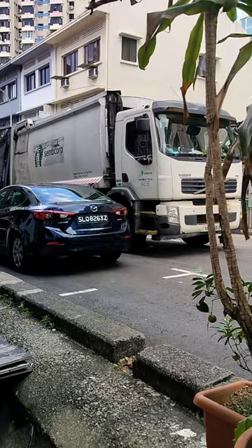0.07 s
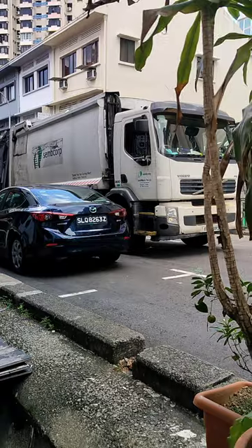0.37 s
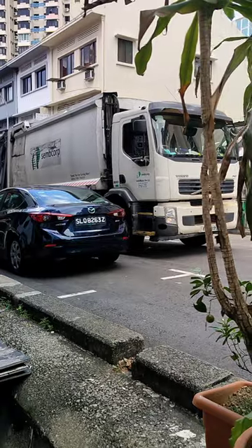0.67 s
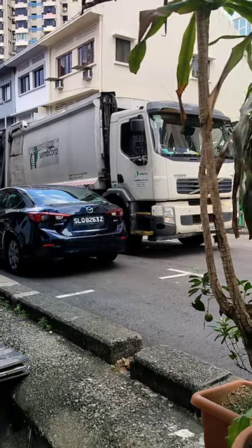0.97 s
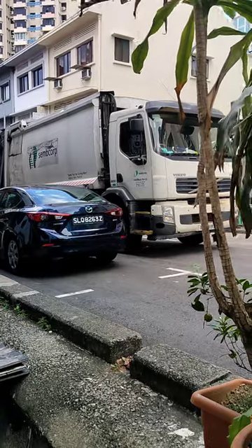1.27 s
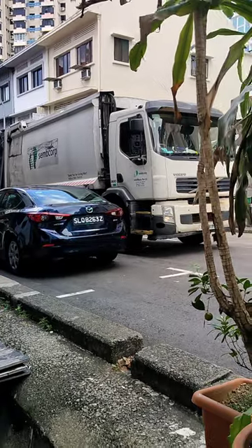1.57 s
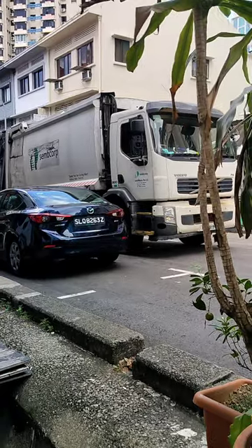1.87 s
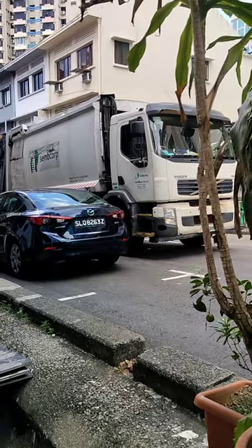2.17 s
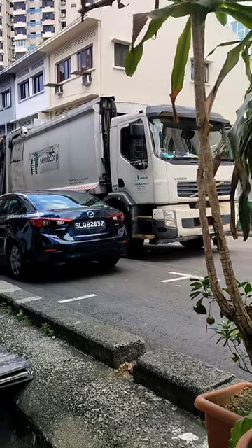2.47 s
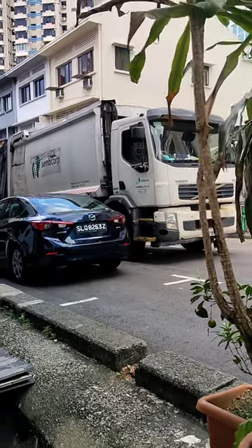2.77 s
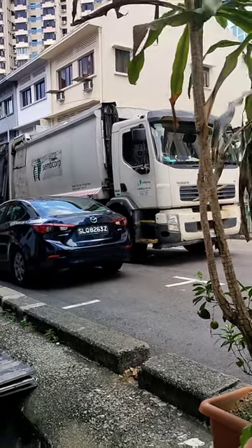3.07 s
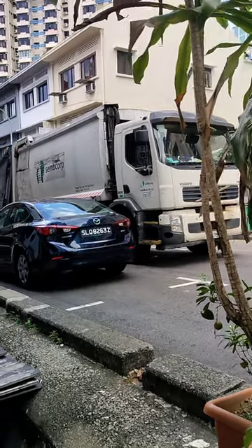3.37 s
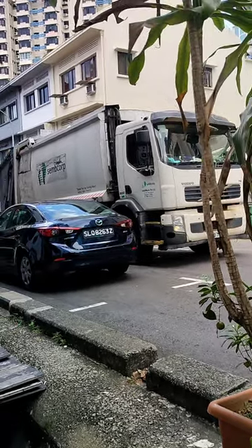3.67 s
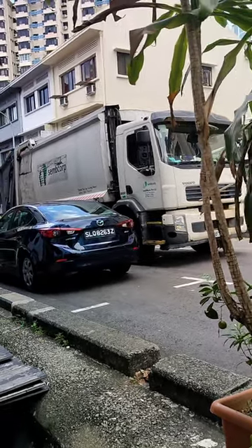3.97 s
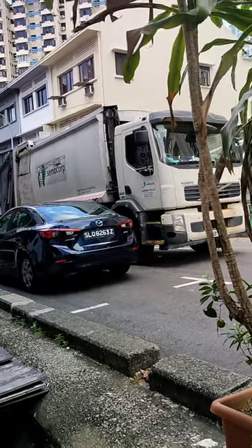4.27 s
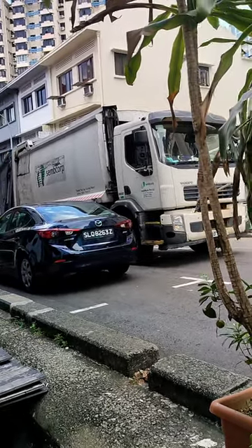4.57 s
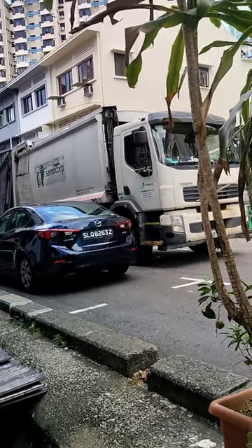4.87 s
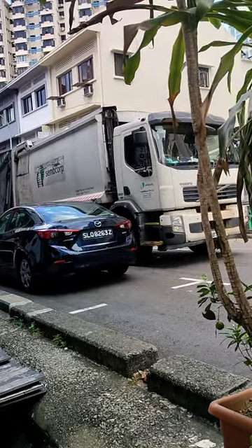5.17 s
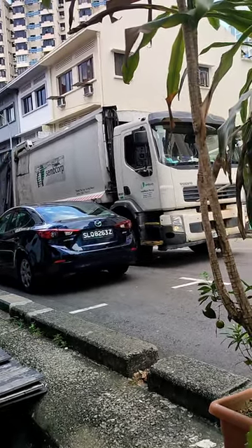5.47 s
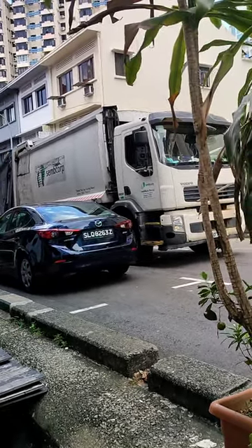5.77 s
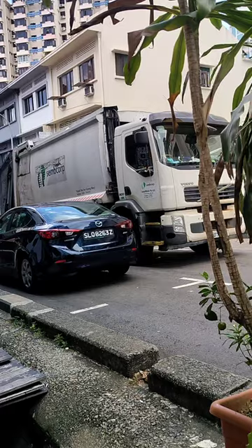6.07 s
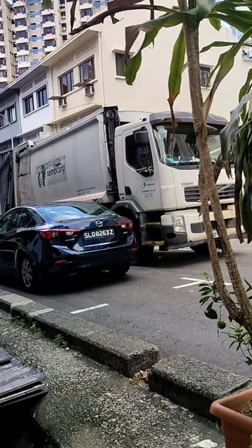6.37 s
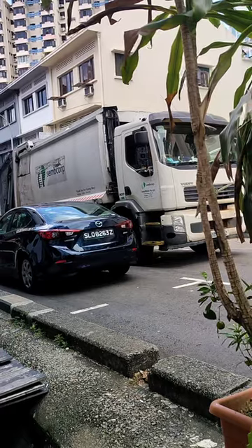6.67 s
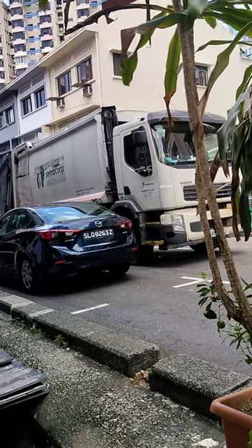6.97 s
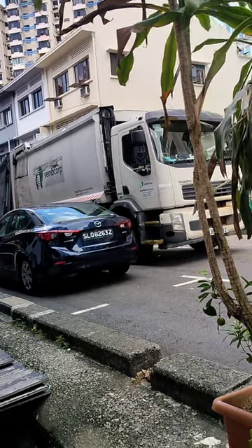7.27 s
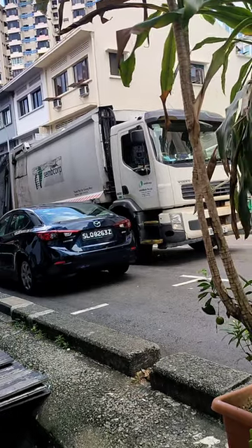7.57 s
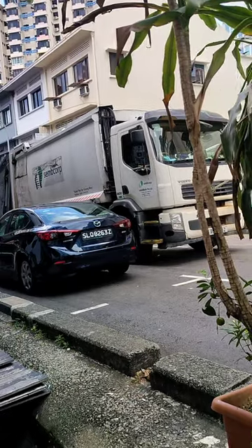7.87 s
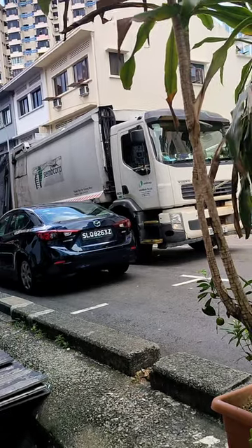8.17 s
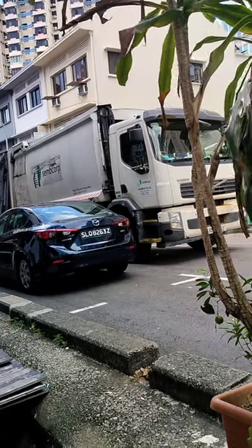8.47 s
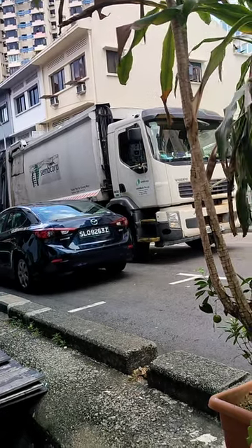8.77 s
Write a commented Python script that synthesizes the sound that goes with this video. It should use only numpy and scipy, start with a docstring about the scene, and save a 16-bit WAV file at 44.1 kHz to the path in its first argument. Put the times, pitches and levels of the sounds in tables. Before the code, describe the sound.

A garbage truck's diesel engine roars and revs under a high hydraulic whine, with air spurts, knocks and clanks.

```python
"""A garbage truck works its hydraulics in a narrow street, the house fronts throwing the sound back.
After a beat of silence its six-cylinder diesel roars in; fan hum, pump hum and gear whine ride on the
crank speed, pump and gears swelling as they cross resonances, with soft thuds and brief squeals.
Near 3.3 s air spurts and the engine revs up. At 6 s the load lets go: teeth knock, the whine ducks,
the rattle deepens. Near 7.3 s air spurts and steel clanks; then the load bites and the revs sink."""
import sys
import numpy as np
from scipy import signal
from scipy.fft import rfft, irfft
from scipy.io import wavfile
from scipy.ndimage import uniform_filter1d

SR = 44100
rng = np.random.default_rng(int(sys.argv[2]) if len(sys.argv) > 2 else 0)


def store_pcm(level_fs):
    """Save levels as 16-bit WAV."""
    pcm = np.round(np.clip(level_fs, -1, 1) * 32767).astype(np.int16)
    wavfile.write(sys.argv[1], SR, np.atleast_2d(pcm).T)


N = 388521
TIME, BINS_HZ = np.arange(N) / SR, np.fft.rfftfreq(N, 1 / SR)
FIRING, RIPPLE, MESH, BELT = 3, 14, 83, 44.82  # cycles per crank turn
LOW_SPEED, FULL_SPEED = 21, 24.5  # crank turns per second
LET_GO_S, TAKE_HOLD_S = 6.07, 7.49  # cues for the hydraulic load


def gain_of(db):
    """Decibels to amplitude."""
    return 10 ** (np.asarray(db) / 20)


def unit_rms(x):
    """Scales to rms 1."""
    return x / np.sqrt(np.mean(abs(x) ** 2) + 1e-20)


def envelope(points):
    """Breakpoints in time, joined into one value per sample."""
    return np.interp(TIME, *np.transpose(points))


def curve_at(points, hz=BINS_HZ):
    """Reads a curve along a log-frequency axis."""
    f, value = np.transpose(points)
    return np.interp(np.log(hz + 1), np.log(f + 1), value)


def trailing(x, lag_s):
    """Follows a control with a lag."""
    keep = np.exp(-1 / (lag_s * SR))
    return x[0] + signal.lfilter([1 - keep], [1, -keep], x - x[0])


def flutter(width_hz):
    """A complex random wobble of rms 1, about width_hz fast."""
    hop = 64
    frames = N // hop + 2
    hz = np.fft.fftfreq(frames, hop / SR)
    wobble = np.fft.ifft((rng.standard_normal((frames, 2)) @ [1, 1j]) / (1 + (hz / width_hz) ** 2))
    return np.interp(TIME, np.linspace(0, TIME[-1], frames), unit_rms(wobble))


def tone(cycles, db, rough, width_hz, spread):
    """A machine tone with a noisy skirt; the share 'spread' of the skirt differs left and right."""
    centre = np.sqrt(1 - spread) * flutter(width_hz)
    sides = np.sqrt(spread) * np.array([flutter(width_hz), flutter(width_hz)])
    wave = (1 + rough * (centre + sides)) * np.exp(2j * np.pi * cycles)
    return gain_of(db) * np.sqrt(2 / (1 + rough ** 2)) * wave.real


# Stereo image of the noise: f/Hz, left-right correlation (capped at 1)
CORRELATION = [(25, 0.95), (70, 0.975), (150, 1.2), (280, 0.8), (500, 0.68), (1000, 0.29), (2000, -0.14),
               (4000, 0), (9000, -0.05)]
def noise(spectrum):
    """Coloured stereo noise of rms 1, centred in the bass and wide in the treble."""
    common, other = rfft(rng.standard_normal((2, N)))
    alike = np.clip(curve_at(CORRELATION), -1, 1)
    pair = np.array([common, alike * common + np.sqrt(1 - alike ** 2) * other])
    return unit_rms(irfft(pair * gain_of(curve_at(spectrum)), N))


# The revs, as the crank's rate of turning: t/s, f/Hz
REVS = [(0.9, 18.06), (1.03, 18.25), (1.28, 19.95), (1.5, 20.69), (1.8, 20.78), (2.08, 20.64), (2.6, 21.2),
        (3.08, 20.88), (3.28, 20.85), (3.52, 23.25), (3.85, 24.54), (4.05, 24.67), (4.6, 24.52),
        (6.0, 24.51), (6.15, 25.0), (6.3, 25.0), (6.9, 24.04), (7.44, 23.3), (7.7, 21.99), (7.93, 21.42),
        (8.45, 22.3), (8.8, 22.2)]
def crankshaft():
    """The master clock of the machine tones: turns so far, and turns per second."""
    speed = envelope(REVS)
    return np.cumsum(speed) / SR, speed


def strain(speed):
    """How fast the revs are changing, smoothed, in turns per second per second."""
    return uniform_filter1d(abs(np.gradient(speed)) * SR, 8000)


def slack(release_s=0.044, grip_s=0.099):
    """0 while the hydraulics load the drive, 1 while it runs free."""
    released = np.clip((TIME - LET_GO_S) / release_s + .5, 0, 1)
    return released * np.clip((TAKE_HOLD_S - TIME) / grip_s + .5, 0, 1)


# The exhaust pipe's voicing of the firing tone: f/Hz, level/dB
EXHAUST_EQ = [(54, -47), (59, -37), (62, -50), (66.5, -49), (69.5, -62), (72, -51), (74, -43)]
# Upper engine orders: cycles per crank turn, level/dB at peak revs
ENGINE_ORDERS = [(6, -43.5), (9, -37), (16, -46), (39, -41.5), (48, -46), (127.8, -48)]
# Where the drive drones: crank f/Hz, level/dB
DRONE_BY_REVS = [(18, -52), (19.8, -48), (20.8, -27.5), (22, -34.5), (24, -32), (24.5, -42)]
def engine_tones(crank, speed):
    """The diesel's pitched body: firing tone, orders that grow with the revs, a two-note drone."""
    exhaust_db = curve_at(EXHAUST_EQ, FIRING * speed)
    firing = tone(FIRING * crank, exhaust_db, rough=0.084, width_hz=4, spread=.05)
    revs_db = 1.9 * (speed - speed.max())
    orders = sum(tone(k * crank, db + revs_db, rough=0.88, width_hz=1.9, spread=0.49)
                 for k, db in ENGINE_ORDERS)
    drone_db = curve_at(DRONE_BY_REVS, speed)
    drone = tone(11.15 * crank, drone_db, rough=0.31, width_hz=5.9, spread=0.083)
    drone += tone(12.25 * crank, drone_db - 2.5, rough=0.59, width_hz=3.4, spread=0.11)
    return firing + orders + drone


# How hard the diesel burns: t/s, relative level/dB
EFFORT_RIDE = [(0.74, -7.5), (1.0, -3), (1.3, -1.3), (2.8, -0.5), (3.5, 0.4), (5.5, 0.4), (7.4, 0.1),
               (8.1, -1.5), (8.8, -2.5)]
# Colours of rushing air, combustion roar and hiss: f/Hz, relative level/dB
AIR_EQ = [(20, -38), (45, -29), (85, -19), (120, -11), (170, -5), (220, 1.5), (280, -1), (400, -6),
          (550, -17.5), (1000, -29.5), (3000, -92)]
ROAR_EQ = [(200, -27), (520, -1), (720, 1.5), (920, 4), (1150, 1), (1500, 0.5), (2000, 0), (2700, -4.5),
           (3500, -5.5), (4400, -9), (5200, -16), (7300, -25), (12000, -45)]
HISS_EQ = [(2000, -14.5), (5000, -9.5), (7000, -9.5), (7600, -8), (8100, 3), (8700, -2.5), (9300, -2),
           (10200, -7), (11600, -6), (13200, -8.5), (15800, -13)]
def engine_roar(crank, speed):
    """Air, combustion and hiss follow the effort; the air gusts as the revs climb."""
    effort_db = envelope(EFFORT_RIDE)
    surge = trailing(np.maximum(np.gradient(speed) * SR, 0), lag_s=0.23)
    throb = 1 + 0.073 * np.cos(2 * np.pi * FIRING * crank)
    air = gain_of(-24 + 0.36 * effort_db + 0.34 * surge) * noise(AIR_EQ)
    roar = gain_of(-26 + effort_db) * throb * noise(ROAR_EQ)
    hiss = gain_of(-29 + 1.03 * effort_db) * (1 + 0.13 * flutter(120).real) * noise(HISS_EQ)
    return air + roar + hiss


# Fader ride of the fan hum: t/s, level/dB
FAN_RIDE = [(0.74, -33), (1.0, -31.5), (1.25, -23), (2.7, -21.5), (3.5, -23), (3.9, -18), (5.2, -21.5),
            (6.0, -23), (6.3, -17.5), (7.4, -19.5), (7.7, -24.5), (8.8, -32)]
def fan(speed):
    """Blades chop the air into a hum and its octave; the fan trails the crank and slips on its clutch."""
    db = envelope(FAN_RIDE)
    driven = trailing(speed, lag_s=.06)
    passes_per_turn = np.interp(driven, [LOW_SPEED, FULL_SPEED], [9.725, 9.59])
    passes = np.cumsum(driven * passes_per_turn) / SR
    hum = tone(passes, db, rough=0.27, width_hz=13, spread=0.2)
    return hum + tone(2 * passes, -35.5 + 0.65 * (db + 21.5), rough=.5, width_hz=13, spread=0.44)


def resonance_db(modes, hz):
    """Level of a tone as its pitch sweeps through a set of resonances."""
    return 10 * np.log10(sum(gain_of(db) ** 2 / (1 + (2 * (hz - f) / width) ** 2)
                             for f, width, db in modes))


# Resonances the pump sweeps through: f/Hz, width/Hz, level/dB
PUMP_PEAKS = [(256, 24, -23.5), (290.7, 4.5, -23.5), (318, 3.8, -21), (589, 14, -36.5), (626, 16, -34.5),
              (700, 47, -45.5), (892, 35, -41), (970, 25, -41)]
def pump(crank, speed, slack_db):
    """Pressure ripple in the oil hums through the body in three harmonics, the higher ones rougher."""
    duck_db = slack_db * slack()
    return sum(tone(k * RIPPLE * crank, resonance_db(PUMP_PEAKS, k * RIPPLE * speed) + duck_db,
                    rough=0.36 * k, width_hz=5, spread=0.88) for k in (1, 2, 3))


def pressure_db(peak_db=4.5, climb_s=0.26, bite_s=.12):
    """Pressure climbs as the ram nears the end of its stroke, and jumps as the load takes hold again."""
    climb = np.exp(-abs(TIME - LET_GO_S) / climb_s) * (TIME < LET_GO_S)
    bite = np.exp(-abs(TIME - TAKE_HOLD_S) / bite_s) * (TIME > TAKE_HOLD_S)
    return peak_db * (climb + bite)


# Resonances the gear whine and its octave sweep through: f/Hz, width/Hz, level/dB
GEAR_PEAKS = [(1500, 30, -39), (1624, 32, -29), (1724, 1.4, -39), (1747, 4.3, -20.5), (1795, 43, -25.5),
              (1861, 40, -25), (1922, 55, -22), (2039, 98, -21.5), (3010, 25, -47), (3440, 18, -34.5),
              (3490, 29, -32), (3676, 61, -38.5)]
def gears(crank, speed, slack_db):
    """Meshing teeth whine, clean at steady full revs, ragged otherwise; wheel runout adds sidebands."""
    load_db = pressure_db() + slack_db * slack()
    mesh_db, octave_db = (resonance_db(GEAR_PEAKS, k * MESH * speed) + load_db for k in (1, 2))
    rough = .18 + .2 * strain(speed) + .07 * np.maximum(FULL_SPEED - speed, 0)
    runout = 1 + 0.016 * np.cos(2 * np.pi * crank) + 0.022 * np.sin(2 * np.pi * 2 * FIRING * crank)
    whine = runout * tone(MESH * crank, mesh_db, rough, width_hz=13.7, spread=0.76)
    return whine + tone(2 * MESH * crank, octave_db, rough=1, width_hz=35, spread=0.94)


# How the body radiates the accessory's whine: f/Hz, level/dB
ACCESSORY_EQ = [(800, -35), (900, -32), (945, -33), (965, -37), (995, -29.5), (1100, -39.5), (1620, -42),
                (1730, -27.5), (1850, -30.5), (1950, -27.5), (2200, -30.5), (2430, -46.5), (2850, -40.5),
                (3300, -53), (3700, -44.5), (4400, -46.5)]
def accessory(crank, speed, slack_db, waver_db):
    """A belt-driven accessory adds a thin, unsteady whine: four harmonics that drift in and out."""
    rough = 0.93 + 0.092 * strain(speed)
    whine = 0
    for k in (1, 2, 3, 4):
        db = curve_at(ACCESSORY_EQ, k * BELT * speed) + slack_db * slack() + waver_db * flutter(3.4).real
        whine += tone(k * BELT * crank, db, rough, width_hz=40, spread=0.85)
    return whine


def casing(blows, ring_hz, t60, attack_s=0.0042):
    """Blows ring one mode of the gear casing, swelling over a few cycles."""
    t = TIME[:SR // 20]
    ring = np.sin(2 * np.pi * ring_hz * t) * gain_of(-60 * t / t60) * (1 - np.exp(-t / attack_s))
    return signal.oaconvolve(blows, ring[None] / abs(ring).max(), axes=1)[:, :N]


def rattle(crank, speed, level_db, slack_db):
    """Loose teeth clatter on the casing twice a firing: louder with revs and effort, deeper off load."""
    db = level_db + 0.88 * (speed - FULL_SPEED) + 1.55 * envelope(EFFORT_RIDE) + slack_db * slack()
    bursts = .5 + np.exp(-(2 * FIRING * crank % 1) / 0.053)
    clatter = bursts * (rng.standard_normal(N) + 0.41 * rng.standard_normal((2, N)))
    middle = casing(clatter, ring_hz=2130, t60=0.009)
    high = casing(clatter[::-1], ring_hz=2343, t60=.007)  # left and right swapped
    low = casing(bursts * rng.standard_normal((2, N)), ring_hz=1876, t60=0.0073)
    return gain_of(db) * unit_rms(middle + gain_of(-7) * high + gain_of(-8 + 5 * slack()) * low)


def street(dry, wet_db, t60):
    """Dense stereo echoes between the house fronts, after a 12 ms pre-delay."""
    t = TIME[:SR // 2]
    tail = rng.standard_normal((2, len(t))) * gain_of(-60 * t / t60) * (t > .012)
    echoes = signal.fftconvolve(dry, tail / np.linalg.norm(tail[0]), axes=1)[:, :N]
    return (dry + gain_of(wet_db) * echoes) / np.hypot(1, gain_of(wet_db))


# Thud cues: t/s, level/dB, half length/s
THUD_CUES = [(0.76, -39, .04), (1.25, -52, 0.046), (3.45, -48, .1), (7.3, -40, .06), (7.48, -40, .04)]
# Their sub-bass colour: f/Hz, relative level/dB
THUD_EQ = [(15, -12), (38, -5), (55, -3), (120, -16), (400, -70)]
def air_thuds():
    """Soft, low puffs of air that swell and fade."""
    swells = sum(gain_of(db) * np.exp(-((TIME - s) / length) ** 2) for s, db, length in THUD_CUES)
    return swells * noise(THUD_EQ)


# Squeal cues: t/s, half length/s, cycles per crank turn, level/dB
SQUEAL_CUES = [(0.98, .07, 134.46, -39), (1.0, .05, 166, -34), (1.24, .08, 89.64, -30),
               (5.15, .14, 179.28, -42)]
def squeals(crank):
    """Single partials of the drive's whine flare up and die away."""
    return sum(np.exp(-((TIME - s) / length) ** 2) * tone(k * crank, db, rough=1.9, width_hz=32, spread=.8)
               for s, length, k, db in SQUEAL_CUES)


# Spurt cues: t/s, level/dB, decay/s
SPURT_CUES = [(3.272, -24, 0.038), (7.258, -24, 0.078), (7.335, -38, 0.045)]
# Their bright colour: f/Hz, relative level/dB
SPURT_EQ = [(200, -8), (800, -18), (3500, 3.5), (6500, -10), (7600, 0), (8300, 9), (10000, 2), (15800, -27)]
def air_spurts(attack_s=0.00098):
    """Air escapes in short hisses with a sharp attack."""
    bursts = sum(gain_of(db) * np.clip((TIME - s) / attack_s, 0, 1) * np.exp(-abs(TIME - s) / decay)
                 for s, db, decay in SPURT_CUES)
    return bursts * noise(SPURT_EQ)


# Hits of tooth on tooth: t/s, level/dB
KNOCK_CUES = [(5.997, -16), (6.009, -17), (6.018, -15), (6.0255, -11), (6.032, -12), (6.0385, -12),
              (6.092, -17), (6.119, -19), (6.133, -20), (6.139, -20), (6.170, -20)]
def knocks():
    """The teeth knock hard as the load lets go, ringing the casing."""
    blows = np.zeros((1, N))
    for s, db in KNOCK_CUES:
        blows[0, round(s * SR)] = gain_of(db)
    return casing(blows, ring_hz=2140, t60=.011)


# Hits from the loading gear: t/s, level/dB
CLANK_CUES = [(7.262, -26), (7.275, -29), (7.298, -23.5), (7.337, -20)]
# Colour of the steel body's many short modes: f/Hz, relative level/dB
STEEL_EQ = [(150, -7), (400, -7), (1400, 4), (2100, 4), (3600, -10), (5000, -15), (12000, -35)]
def clanks(decay_s):
    """Dull blows on the steel body, with a soft echo."""
    blows = sum(gain_of(db) * (TIME > s) * np.exp(-abs(TIME - s) / decay_s) for s, db in CLANK_CUES)
    return street(blows * noise(STEEL_EQ), wet_db=-18, t60=0.44)


def scene():
    """The mix: engine, fan, pump and air dry, gear whine nearly dry, accessory and rattle wetter."""
    crank, speed = crankshaft()
    whine = street(gears(crank, speed, slack_db=-11.5) + squeals(crank) + knocks(), wet_db=-14, t60=.8)
    belt = accessory(crank, speed, slack_db=-16, waver_db=2)
    machinery = street(belt + rattle(crank, speed, level_db=-29.5, slack_db=1), wet_db=-6.5, t60=1)
    hum = pump(crank, speed, slack_db=-1) + fan(speed)
    diesel = engine_tones(crank, speed) + engine_roar(crank, speed)
    return whine + machinery + hum + diesel + air_spurts() + air_thuds() + clanks(decay_s=0.033)


# Stereo balance, and its extra tilt once the left side is shaded: f/Hz, left minus right level/dB
BALANCE = [(100, -1.5), (700, 2), (1300, -2), (2400, -1.5), (4400, -2.5), (7900, -0.5), (9000, -4.5),
           (15000, -4.5)]
SHADE_TILT = [(100, 1), (250, -3), (1000, -1.5), (2400, -2), (4400, -1), (8000, -4), (15000, -2.5)]
def record(dry, start_s=0.7375, shaded_s=5.0, crossfade_s=0.8, cutoff_hz=15850):
    """The sound cuts in, low-passed and leaning right, more so once the left microphone is shaded."""
    spectra = rfft(dry) * gain_of(np.outer([.5, -.5], curve_at(BALANCE)))
    shaded = irfft(spectra * gain_of(np.outer([.5, -.5], curve_at(SHADE_TILT))), N)
    blend = np.clip((TIME - shaded_s) / crossfade_s + .5, 0, 1)
    sound = ((1 - blend) * irfft(spectra, N) + blend * shaded) * (TIME > start_s)
    lowpass = signal.firwin(801, cutoff_hz, window=("kaiser", 9), fs=SR)
    return signal.oaconvolve(sound, lowpass[None], "same", axes=1)


dry = scene()
out = record(dry)
store_pcm(out)
```